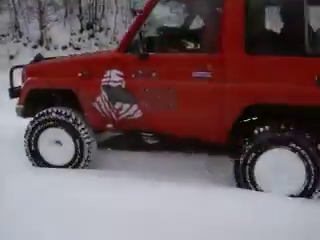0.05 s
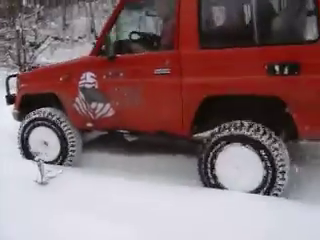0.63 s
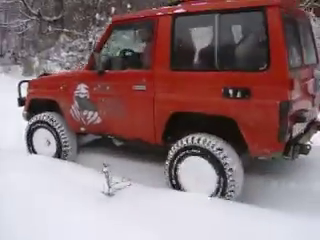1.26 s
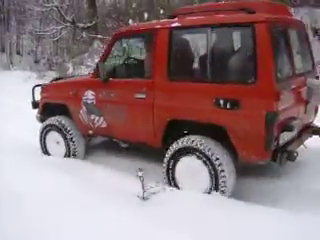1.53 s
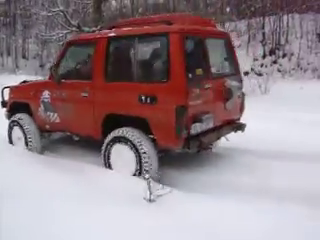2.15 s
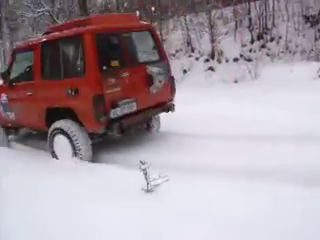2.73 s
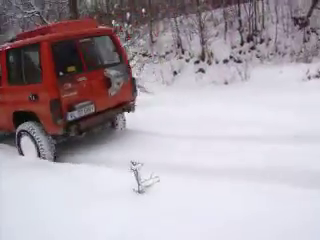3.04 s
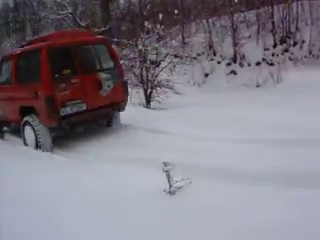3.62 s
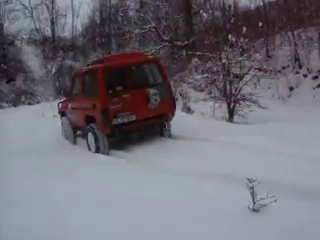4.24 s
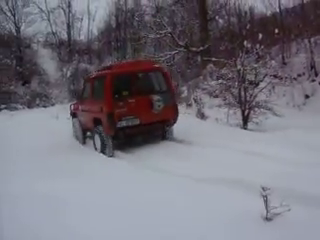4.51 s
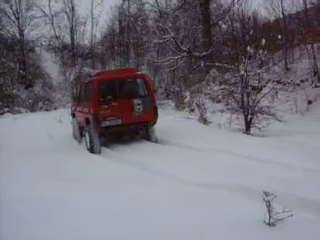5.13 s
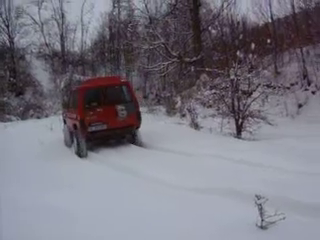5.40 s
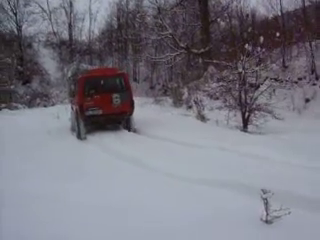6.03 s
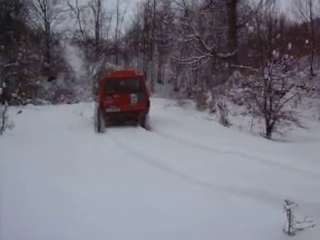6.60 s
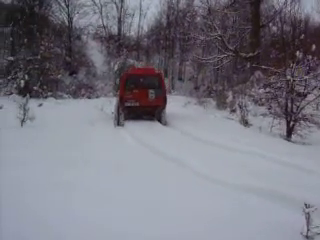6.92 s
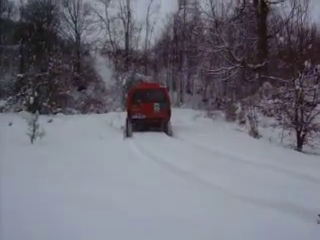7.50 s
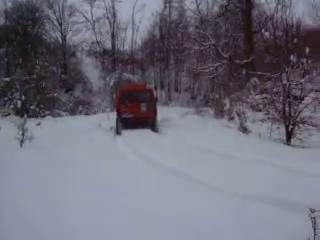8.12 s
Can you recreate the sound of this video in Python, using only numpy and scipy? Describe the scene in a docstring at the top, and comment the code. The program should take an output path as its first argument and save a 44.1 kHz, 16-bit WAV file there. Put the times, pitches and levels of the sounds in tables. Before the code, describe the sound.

From the start, a diesel off-road vehicle crawls past close by, with a deep, steady exhaust throb and a rapid knock. For the first two seconds its tyres dig into deep snow with a dull rumble. The tailpipe adds a pulsing, raspy hiss and a high, warbling whistle, which flares at about 0.5, 3.5, 5 and 7 seconds. The tail passes at around 2 seconds, and by 4 the knock has become hollower and crisper. The tyres slip with soft, fuzzy howls, once briefly near the start, then repeatedly from 2 seconds onward. From about 3.5 seconds the engine speeds up a little as it pulls away, peaking near 6.4 seconds with a slight swell of snow rumble. It then slows, fainter in the distance. A small camera's own hiss and thin, high whine grow through the second half, until the end at about 8 seconds.

```python
"""A diesel off-road vehicle crawls past, its tyres rumbling as they dig into deep snow.
Each firing pushes a pulse out of the exhaust, with a knock, a puff of hiss and a warbling whistle.
After two seconds the tail passes, then turns towards us, and the knock gets hollower and crisper.
The engine speeds up as it pulls away along a wooded track, the tyres howling on packed snow.
At last it slows again in the distance, while a small camera's own hiss and whine grow louder."""
import sys
import numpy as np
from scipy import signal
from scipy.fft import rfft, irfft, next_fast_len
from scipy.io import wavfile

SR = 44100
rng = np.random.default_rng(int(sys.argv[2]) if len(sys.argv) > 2 else 0)


def log_audio(samples):
    """Write samples as a 16-bit WAV file to the path given in sys.argv[1]."""
    # one column per channel
    frames = np.atleast_2d(samples).T
    # limit to full scale, then quantise
    limited = np.clip(frames, -1, 1)
    pcm = np.round(limited * 32767).astype(np.int16)
    wavfile.write(sys.argv[1], SR, pcm)


N = 364266
TIME = np.arange(N) / SR
CRUISE_HZ = 40  # firings per second at an easy crawl
BONNET_PASS_S, TAIL_PASS_S = 0.11, 2.04  # when each end of the vehicle is nearest

# How fast the engine runs. Each row: time in seconds, firings per second.
ENGINE_SPEED = [(0.0, 42.305), (0.372, 35.929), (0.796, 41.119), (1.62, 38.212), (1.758, 39.103),
                (1.901, 37.135), (2.9, 36.81), (3.064, 38.693), (3.425, 39.411), (3.62, 42.388),
                (4.62, 44.006), (4.89, 42.913), (5.835, 45.064), (6.363, 47.437), (6.814, 44.378),
                (7.335, 43.192), (7.494, 40.568), (8.26, 36.913)]
# Moments when the engine works harder. Each row: middle in seconds, length in seconds,
# rise of the knock in dB, rise of the exhaust pulses in dB.
STRAINS = [(0.012, 0.19, 2.5, 10.5), (1.756, 1, 2.5, -0.5), (4.1, 0.6, 4, 0.5), (5.104, 0.95, 4, 1),
           (7.253, 0.3, 2, 1.5)]
# The gas jet from the tailpipe, which feeds hiss and whistle. Each row: time in seconds, level in dB.
GAS_JET = [(0.0, -50), (0.2, -53), (1.16, -48.5), (1.7, -48.5), (3.56, -43), (4.56, -50.5), (5.08, -48.5),
           (5.85, -61), (8.15, -57)]
# Moments when the whistle catches and sings out. Each row: middle in seconds, length in seconds,
# rise of the tone in dB, rise of its octave in dB, shift of the pitch in Hz.
WHISTLE_FLARES = [(.45, .28, 8, 3, 110), (1.55, .7, -0.5, -2, -39.5), (3.35, .35, 3.5, 1, -70),
                  (3.7, 0.25, 4.5, 8, 0.5), (4.15, 0.47, -1, 8, 0), (5.0, .8, 4, -8, 89),
                  (7.25, .4, 9.5, 8, -70.5)]


def amp(db):
    """Turns decibels into a number to multiply by."""
    return 10 ** (np.asarray(db) / 20)


def unit(x):
    """Scales a signal so that its average strength (rms) is 1."""
    return x / np.sqrt(np.mean(x ** 2) + 1e-20)


def curve(rows):
    """Joins rows of time and value with straight lines, giving a value for every sample."""
    return np.interp(TIME, *np.transpose(rows))


def swells(rows, index=0):
    """Adds up rounded bumps. Each row: middle, length, then heights; index picks which height."""
    return sum(heights[index] * np.exp(-(2 * (TIME - s) / length) ** 2) for s, length, *heights in rows)


def response(spectrum, hz):
    """Looks up the level in dB that a spectrum gives to a pitch."""
    table_hz, db = np.transpose(spectrum)
    return np.interp(np.log(hz), np.log(table_hz), db)


def colour(x, spectrum):
    """Makes some frequencies louder than others, then scales the result to strength 1."""
    size = next_fast_len(N + 4096)
    hz = np.fft.rfftfreq(size, 1 / SR)
    shaped = rfft(x, size) * amp(response(spectrum, hz + 1))
    return unit(irfft(shaped, size)[:N])


def drift(rate_hz):
    """A random wander of strength 1 that changes at about this rate."""
    times = np.arange(0, TIME[-1] + 1, .5 / rate_hz)
    return unit(np.interp(TIME, times, rng.standard_normal(N)[:len(times)]))


def resonate(x, hz, width_hz):
    """Makes a signal ring in a narrow band around a moving pitch."""
    spin = np.exp(2j * np.pi * np.cumsum(hz) / SR)
    decay = np.exp(-np.pi * width_hz / SR)
    return 2 * (spin * signal.lfilter([1 - decay], [1, -decay], x / spin)).real


def puffs(firings, lead, rise, fall, depth, uneven_db):
    """A swell of random strength at each firing; lead, rise and fall are shares of one firing's time."""
    position = firings + lead + .5
    age = position % 1 - .5
    strength = amp(uneven_db * rng.uniform(-1, 1, N))[np.abs(position).astype(int)]
    shape = np.exp(np.where(age < 0, age / rise, -age / fall))
    return unit(1 + depth * strength * shape)


def behind():
    """0 while the vehicle is side-on, 1 once its tail faces us."""
    return np.clip((TIME - 2.5) / 1.4, 0, 1)


def distance_loss(pass_s, speed_m_per_s=1.59, nearest_m=3.76):
    """The dB lost as sound spreads out from something that drives by in a straight line."""
    return 20 * np.log10(np.hypot(1, speed_m_per_s * (TIME - pass_s) / nearest_m))


def camera(hiss_db=-57, wobble_hz=7):
    """The camera's electronics add a hiss and a thin, slightly wavering whine."""
    # The whine's tones. Each row: pitch in Hz, level in dB before the swell.
    whine_tones = [(6961, -90), (7208, -62), (7424, -65.5), (7542, -80)]
    # The colour of the hiss. Each row: frequency in Hz, relative level in dB.
    hiss_spectrum = [(100, 6), (900, 15.5), (1500, 3), (3000, 6.5), (6000, -4.5), (9000, -28), (10500, 1),
                     (11500, 5)]
    # Both swell slowly. Each row: time in seconds, boost in dB.
    slow_swell = [(0, 0), (2.7, 0.5), (5, 3), (7.1, 4), (7.7, 7.5), (8.26, 4.5)]
    wobble = np.cumsum(wobble_hz * drift(25)) / SR
    whine = sum(amp(db) * np.sqrt(2) * np.sin(2 * np.pi * (hz * TIME + wobble + rng.random()))
                for hz, db in whine_tones)
    hiss = amp(hiss_db) * colour(rng.standard_normal(N), hiss_spectrum)
    return amp(curve(slow_swell)) * (whine + hiss)


def tyre_rumble(rolling_db=-44.5):
    """Snow gives way under the tread with a dull rumble, louder where the tyres dig in."""
    # The colour of the rumble. Each row: frequency in Hz, relative level in dB.
    snow_spectrum = [(15, -52), (35, -6.5), (58, 0.5), (80, -5), (125, -10.5), (215, -12), (270, -19.5),
                     (400, -27), (800, -50)]
    # Digging into deep snow. Each row: middle in seconds, length in seconds, boost in dB.
    churns = [(.15, 1, 12.3), (.75, 0.66, 9.6), (1.38, 0.74, 11.7), (6.35, 1, 5.2)]
    return amp(rolling_db + swells(churns)) * colour(rng.standard_normal(N), snow_spectrum)


def tyre_howls(fuzz=0.12, scoop=0.066):
    """Tyres slip on packed snow: fuzzy tones slide up to pitch, swell quickly and fade."""
    # Each row is one slip: start in seconds, length in seconds, pitch in Hz, peak level in dB.
    slips = [(0.23, 0.41, 737, -43.5), (2.034, 0.75, 800, -42.5), (2.55, 1.03, 1777, -47.5),
             (2.75, 0.77, 520, -49), (3.5, 2.8, 1744, -54), (4.707, 1.16, 1722, -46), (5.3, 1.6, 820, -52),
             (5.95, 1.15, 1704, -55.5), (6.98, 1.35, 1690, -53)]
    out = np.zeros(N)
    for start, length, hz, db in slips:
        span = (TIME > start) & (TIME < start + 2 * length)  # leaves time to die away
        age = (TIME[span] - start) / (0.2 * length)  # 1 at the loudest point
        pitch = hz * (1 - scoop * np.exp(-3 * age))
        noise = rng.standard_normal(N)[span]
        tone = resonate(resonate(noise, pitch, fuzz * hz), pitch, fuzz * hz)
        out[span] += amp(db) * (age * np.exp(1 - age)) ** 0.85 * unit(tone)
    return out


def tailpipe_hiss(firings, boost_db=1.0):
    """Gas rushes from the tailpipe at each firing, with a metallic rasp."""
    # The colour of the rushing gas. Each row: frequency in Hz, relative level in dB.
    gas_spectrum = [(900, -25), (1450, -6.5), (2300, 1), (3200, -1.5), (4400, -0.5), (5300, -7),
                    (6200, -24), (6900, -11), (8500, -12.5), (10500, -7), (11500, -16.5)]
    # The rasp shifts as the vehicle turns. Each row: time in seconds, pitch in Hz.
    rasp_pitch = [(0, 2200), (1.2, 2670), (2.1, 2780), (3.6, 3400), (4.3, 3800), (5.3, 3460), (5.9, 2320),
                  (7.7, 2460)]
    noise = rng.standard_normal(N)
    bursts = noise * puffs(firings, lead=0.028, rise=0.14, fall=0.12, depth=1.75, uneven_db=4.0)
    rasp = 0.81 * resonate(bursts, curve(rasp_pitch), width_hz=220)
    level_db = curve(GAS_JET) + boost_db + 0.48 * drift(5)
    return amp(level_db) * colour(bursts + rasp, gas_spectrum)


def whistle_pitch(base_hz=5251, hz_per_firing_hz=123, lag_s=0.29):
    """The gas flow trails the engine's speed, and the whistle's pitch follows the flow."""
    decay = np.exp(-1 / (lag_s * SR))
    flow = signal.lfilter([1 - decay], [1, -decay], curve(ENGINE_SPEED) - CRUISE_HZ)
    earlier_rev_hz = 1400 * np.exp(-TIME / .5)  # the pitch starts high, still falling from a rev
    return base_hz + hz_per_firing_hz * flow + earlier_rev_hz + swells(WHISTLE_FLARES, index=2)


def whistle_levels(hz):
    """Levels in dB of the whistle and its octave: they follow the jet and the pipe's favourite pitches."""
    # How well the tailpipe sounds each pitch. Each row: pitch in Hz, boost in dB.
    pipe_response = [(4950, 1.5), (5220, -1), (5420, -5), (5600, -4), (5780, 0), (5980, -4), (6450, -15),
                     (9750, 6), (10500, 0.5), (11000, -6.5), (11300, -8), (12000, -28)]
    jet_db = curve(GAS_JET) - 0.47 * distance_loss(TAIL_PASS_S)  # so high a tone fades more with distance
    tone_db = swells(WHISTLE_FLARES) + response(pipe_response, hz) + 0.5
    octave_db = swells(WHISTLE_FLARES, index=1) + response(pipe_response, 2 * hz) - 4.0
    return jet_db + tone_db, jet_db + octave_db


def tailpipe_whistle(firings, pulses, full_jet_db=-45):
    """Gas whistles over an edge in the tailpipe, and each pulse shakes the pitch."""
    hz = whistle_pitch()
    tone_db, octave_db = whistle_levels(hz)
    warble = amp(.55 * np.minimum(curve(GAS_JET) - full_jet_db, 0))  # a weaker jet warbles less
    chirp = 140 * np.exp(-(np.sin(np.pi * (firings + .06)) / .24) ** 2)  # up at each push
    slosh = 60 * np.cos(2 * np.pi * 3 * (firings + .08))  # to and fro between pushes
    sag = 110 * np.sin(2 * np.pi * firings)  # down just after a push
    flutter = 50 * drift(500)
    shake = 2500 * pulses + (chirp + slosh) * (1 - behind())
    hz = hz + warble * shake - sag * behind() + flutter
    angle = 2 * np.pi * np.cumsum(hz) / SR
    tone = np.sin(angle) * puffs(firings, lead=0, rise=0.2, fall=0.22, depth=3.2, uneven_db=3.0)
    octave = np.sin(2 * angle) * unit(amp(-55 * pulses))  # strongest when the gas is sucked back
    breathiness = unit(amp(2 * drift(300)))
    return np.sqrt(2) * breathiness * (amp(tone_db) * tone + amp(octave_db) * octave)


def diesel_knock(firings, base_db=-40, db_per_firing_hz=0.3943):
    """Each firing clatters, louder with speed and strain, quieter as the bonnet moves off."""
    # The clatter from the side. Each row: frequency in Hz, relative level in dB.
    side_spectrum = [(180, -25), (280, -4), (380, -3), (480, -1.5), (600, -1), (780, 1.5), (980, -3),
                     (1200, -8), (1480, -21), (2000, -48)]
    # From behind, the clatter is deeper, with a hollow around 400-700 Hz.
    # Each row: frequency in Hz, relative level in dB.
    rear_spectrum = [(180, -3.5), (290, 1), (400, -6), (490, -2), (620, -7.5), (820, -0.5), (930, -1),
                     (1180, -4), (1450, -17.5), (2000, -36)]
    noise = rng.standard_normal(N)
    side_knocks = noise * puffs(firings, lead=.01, rise=0.061, fall=0.2, depth=0.86, uneven_db=7.0)
    rear_knocks = noise * puffs(firings, lead=0.019, rise=0.1, fall=0.11, depth=1.54, uneven_db=3.5)
    side = np.sqrt(1 - behind()) * colour(side_knocks, side_spectrum)
    rear = np.sqrt(behind()) * colour(rear_knocks, rear_spectrum)
    effort_db = db_per_firing_hz * (curve(ENGINE_SPEED) - CRUISE_HZ) + swells(STRAINS)
    return amp(base_db + effort_db - 0.97 * distance_loss(BONNET_PASS_S)) * (side + rear)


def silencer_levels():
    """Levels in dB of the exhaust's tones at 1, 2, 3 and 4 times the firing rate."""
    # What the silencer lets through. Each row: frequency in Hz, level in dB.
    silencer = [(36.5, -26.5), (38.7, -29.5), (41, -26.5), (47, -25.5), (72, -30.5), (86, -33),
                (100, -32.5), (116, -29.5), (128, -38.5), (145, -43), (158, -30), (172, -39), (190, -44)]
    rate, loss_db = curve(ENGINE_SPEED), distance_loss(TAIL_PASS_S)
    lowest, *higher = [response(silencer, k * rate) for k in range(1, 5)]
    strain_db = swells(STRAINS, index=1)
    # Snow soaks up the higher tones, but hardly the lowest.
    return [lowest - 0.46 * loss_db] + [db + strain_db - 1.91 * loss_db for db in higher]


def pipe_ring(firings):
    """The engine's overtones sound out as they slide through the pitches at which the pipe rings."""
    # Each row is one ringing band: pitch in Hz, width in Hz, level in dB relative to the pulses' tones.
    resonances = [(157.8, 16.5, -8), (212.3, 12.3, -9), (307.5, 32.4, -10)]
    rate = curve(ENGINE_SPEED)
    ring = np.zeros(N)
    for k in (3.5, 4.5, 5, 5.5, 6, 7):  # unequal cylinders add the half steps
        gain = sum(amp(db) / (1 + (2 * (k * rate - hz) / width) ** 2) for hz, width, db in resonances)
        ring += gain * np.sin(2 * np.pi * k * firings)
    return ring


def exhaust(firings, jitter=0.0043, waver_db=0.5):
    """Gives two sounds: the pipe's deep, ringing throb, and the sharp push and suck of each firing."""
    throb_db, *pulse_dbs = silencer_levels()
    firings = firings + jitter * drift(18)
    throb = -amp(throb_db) * np.cos(2 * np.pi * firings)
    pulses = -sum(amp(db) * np.sin(2 * np.pi * k * firings) for k, db in enumerate(pulse_dbs, 2))
    ring = pipe_ring(firings + jitter * drift(5.5))  # the ringing wavers on its own
    ring *= amp((pulse_dbs[0] + pulse_dbs[1]) / 2 + 0.61 * drift(6))
    pulses *= amp(waver_db * drift(17))
    return np.sqrt(2) * (throb + ring), np.sqrt(2) * pulses


def scene():
    """One running count of firings keeps the engine's sounds in step; tyres and camera join them."""
    firings = .653 + np.cumsum(curve(ENGINE_SPEED)) / SR  # starts partway between two firings
    throb, pulses = exhaust(firings)
    engine = throb + pulses + diesel_knock(firings)
    tailpipe = tailpipe_hiss(firings) + tailpipe_whistle(firings, pulses)
    return (engine + tailpipe + tyre_rumble() + tyre_howls() + camera())[None]


def record(dry, top_hz=12694):
    """The camera keeps every second sample, so the whistle's octave folds back down above SR / 4."""
    halved = 2 * dry * (np.arange(N) % 2)
    smoothing = signal.firwin(65, SR / 4, window=("kaiser", 9), fs=SR)
    treble_cut = signal.firwin(511, top_hz, window=("kaiser", 9), fs=SR)
    smooth = signal.oaconvolve(halved, smoothing[None], "same")
    return signal.oaconvolve(smooth, treble_cut[None], "same")


dry = scene()
out = record(dry)
log_audio(out)
```